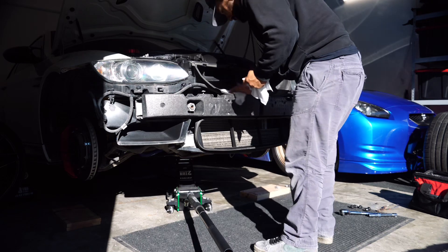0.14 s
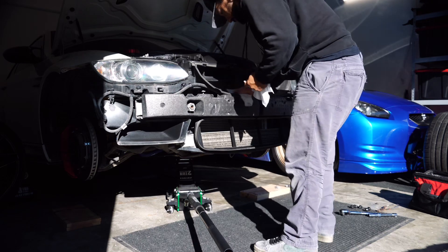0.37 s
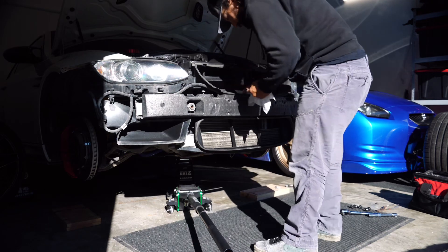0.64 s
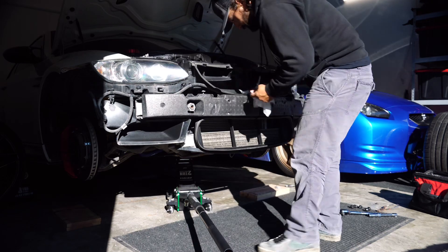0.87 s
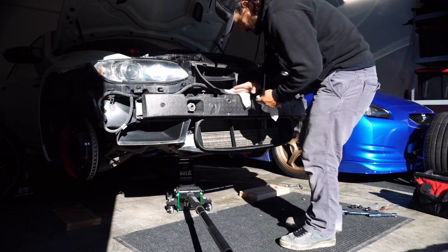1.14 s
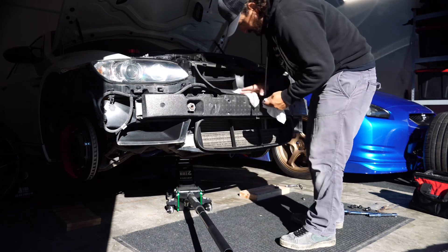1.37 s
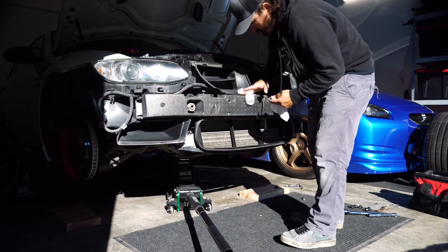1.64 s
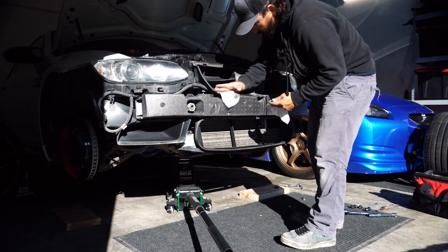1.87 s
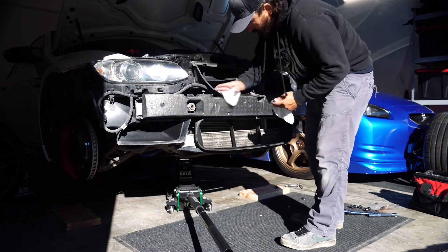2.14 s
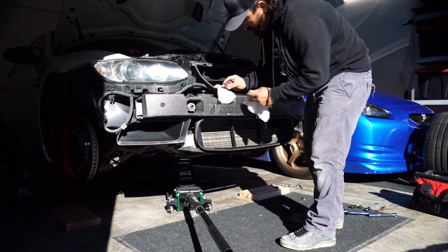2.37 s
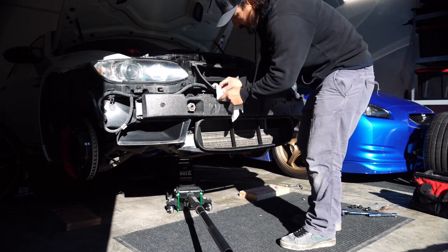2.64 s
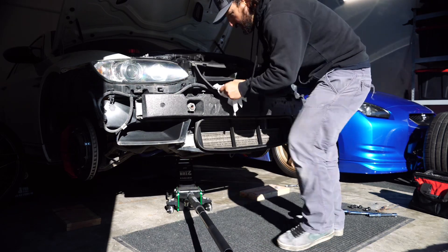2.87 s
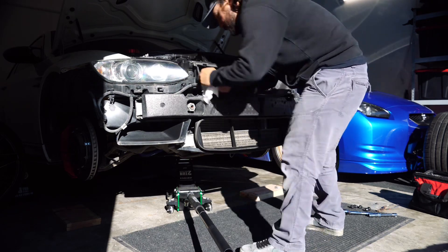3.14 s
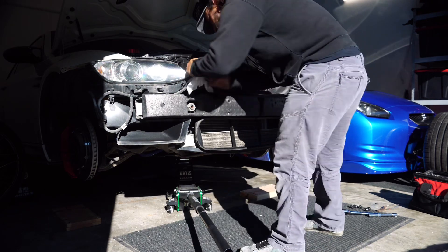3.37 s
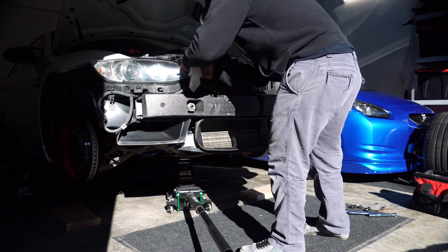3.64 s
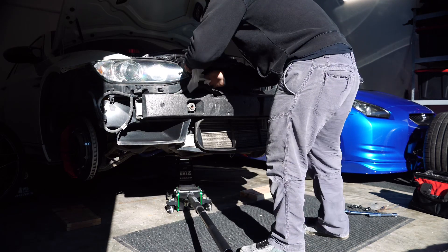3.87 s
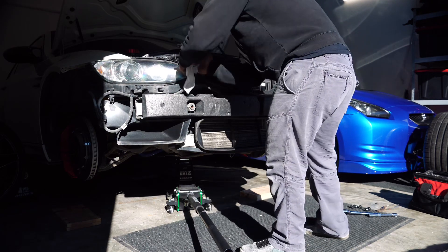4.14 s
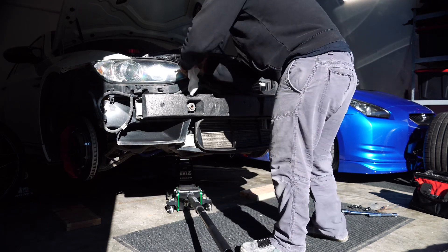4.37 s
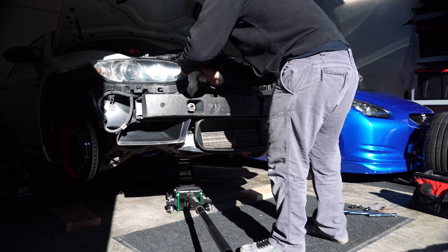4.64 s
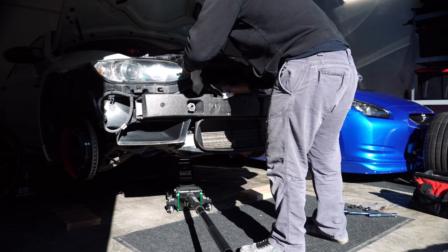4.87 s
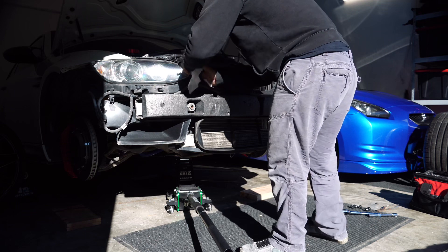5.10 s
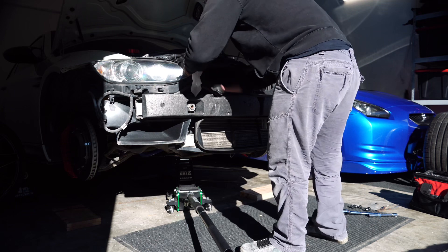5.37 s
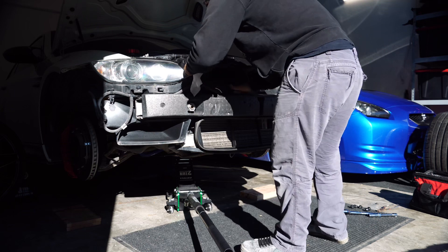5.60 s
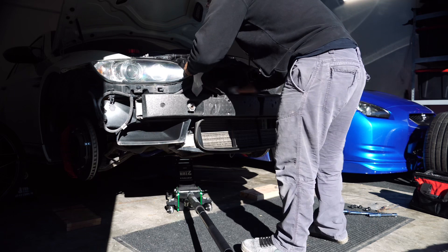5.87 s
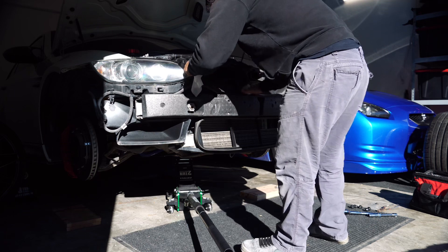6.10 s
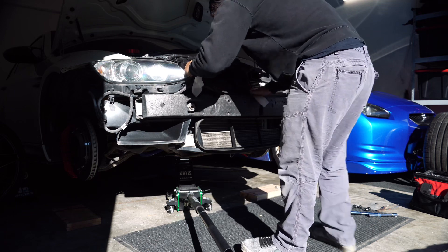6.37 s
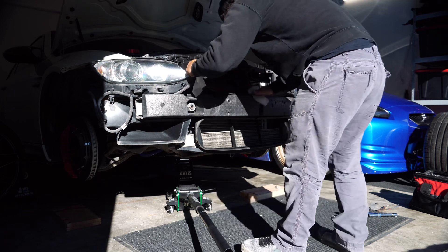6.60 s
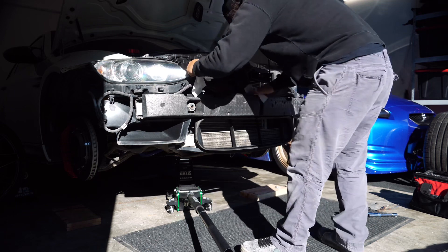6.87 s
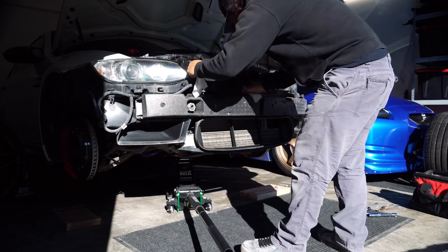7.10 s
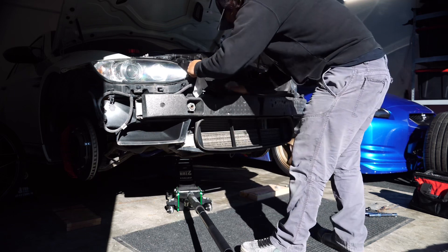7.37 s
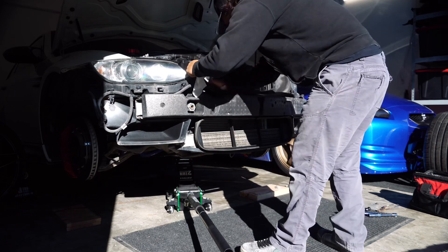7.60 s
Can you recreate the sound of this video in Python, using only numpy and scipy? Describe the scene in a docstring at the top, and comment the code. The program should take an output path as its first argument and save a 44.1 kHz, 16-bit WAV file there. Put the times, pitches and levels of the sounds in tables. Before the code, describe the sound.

At the mouth of a garage, a cloth rag scrubs a car's bare front in quick, gritty back-and-forth strokes from the outset. Loose clips and hollow panels tick and knock, hardest just after four seconds, followed by a short squeak. A distant dove coos early and near the end. Low wind rumbles on the unshielded microphone, buffeting around two seconds and violently distorting around seven.

```python
"""A cloth rag is heard at once, scrubbing to and fro over the bare front of a car at the mouth of a garage.
The rag is friction noise shaped by hand speed, with drumming of the panel; knuckles and loose clips knock
the panel's decaying modes, and the cloth briefly squeaks and swishes as gliding bands of noise.
Gusts of wind, low noise, pressure jolts and one bright crackle, drive the microphone into its limiter.
Far off a dove coos, a gliding tone with its octave, over steady air noise; sparse taps echo the work."""
import sys
import numpy as np
from scipy import signal
from scipy.fft import rfft, irfft
from scipy.io import wavfile
from scipy.ndimage import uniform_filter1d, minimum_filter1d

SR = 44100
rng = np.random.default_rng(int(sys.argv[2]) if len(sys.argv) > 2 else 0)


def persist_wave(psi):
    """Save psi, clipped to +-1, as 16-bit WAV."""
    counts = np.round(np.clip(psi, -1, 1) * 32767).astype(np.int16)
    wavfile.write(sys.argv[1], SR, np.atleast_2d(counts).T)


def volts(x):
    """Linear amplitude factor 10**(x/20) for a level x in dB, scalar or array-like."""
    e = np.asarray(x, float) / 20
    return 10 ** e


N = 341334  # length [samples]
HZ = np.fft.rfftfreq(N, 1 / SR)


def evened(x):
    """Normalisation: scales a signal to rms 1."""
    return x / np.sqrt(np.mean(x ** 2) + 1e-20)


def read(points, hz):
    """Interpolation: reads a spectrum on a logarithmic frequency axis."""
    f, value = np.transpose(points)
    return np.interp(np.log(hz + 1), np.log(f + 1), value)


def along(rows):
    """Interpolation: reads each column of a time curve at every sample."""
    s, *columns = np.transpose(rows)
    return [np.interp(np.arange(N) / SR, s, c) for c in columns]


def coloured(x, points, lo, hi):
    """Linear filtering: multiplies the spectrum of x by a curve, then sets rms 1 between lo and hi Hz."""
    z = rfft(x) * volts(read(points, HZ))
    in_band = irfft(z * (HZ > lo) * (HZ < hi), N)
    return irfft(z, N) / np.sqrt(np.mean(in_band ** 2))


def wobble(samples):
    """Low-pass noise: twice-averaged chance of rms 1, slower for a longer average."""
    once = uniform_filter1d(rng.standard_normal(N), int(samples))
    return evened(uniform_filter1d(once, int(samples)))


# Spectrum of outdoor air: (frequency [Hz], relative spectral level [dB])
AIR_SPECTRUM = [(35, -29), (60, 1), (183, -6), (313, -13), (869, -13.5), (1100, -15.5), (1870, -22.5),
                (3510, -25), (7210, -36.5), (12900, -39), (15500, -60.5)]


def air():
    """Stationary broadband noise: a random signal takes on the spectrum of the outdoor air."""
    return volts(-52) * coloured(rng.standard_normal(N), AIR_SPECTRUM, 150, 15000)


# Coos of the dove: (start [s], length [s], starting pitch [Hz], glide over the coo [Hz], rms level before
# quaver and swell [dB])
COOS = [(.42, 0.12, 488, 16, -45.5), (.64, 0.3, 486, 27, -47), (1.33, 0.13, 503, 0, -40),
        (7.27, 0.55, 509, 4.5, -46.5)]


def dove():
    """Frequency modulation: a nearly pure whistle with a faint octave glides and quavers a little."""
    out = np.zeros(N + SR)
    sway_hz, sway_db = 7.0 * wobble(1100), 2.4 * wobble(500)
    for start, length, hz, glide_hz, db in COOS:
        u = np.linspace(0, 1, round(length * SR))
        first = round(start * SR)
        at = np.minimum(first + np.arange(len(u)), N - 1)
        turn = 2 * np.pi * np.cumsum(hz + glide_hz * u + sway_hz[at]) / SR
        swell_db = -6.0 * (u - .3) ** 2 / .3
        whistle = np.sin(turn) + volts(-20.5) * np.sin(2 * turn)
        tone = volts(db + sway_db[at] + swell_db) * whistle
        out[first:][:len(u)] += np.sqrt(2) * tone * signal.windows.tukey(len(u), .45)
    return out[:N]


# The hardest buffets: (time of the peak [s], height before the rebound is taken off [full scale, negative =
# suction], rise [s])
JOLTS = [(1.734, -1.3, 0.011), (1.771, 0.3, 0.0085), (1.843, -0.6, 0.0078), (1.866, -0.4, 0.0081),
         (1.911, 0.4, 0.012), (1.959, .7, 0.0068), (6.973, 0.8, 0.015), (6.995, -3.3, 0.0062),
         (7.021, 2.5, .009), (7.049, 3, .007), (7.13, 0.6, 0.0065), (7.145, -0.5, 0.0038),
         (7.181, 3.5, 0.00715), (7.228, -2.4, .008), (7.25, 0.74, 0.0042), (7.375, 0.97, 0.0097)]


def jolts():
    """Pressure pulse: each jolt is a hump with a steep front and a slow, shallow rebound."""
    front_power, rebound_share = 4.5, .2
    out = np.zeros(N)
    for s, height, rise in JOLTS:
        u = np.arange(SR // 5) / SR / rise
        hump = (u * np.exp(1 - u)) ** front_power
        rebound = rebound_share * (u / 3 * np.exp(1 - u / 3)) ** 2
        out[round((s - rise) * SR):][:len(u)] += height * (hump - rebound)
    return out


# Wind on the microphone: (time [s], level of the deep push [dB], flutter over the push [dB])
GUSTS = [(0.0, -27, -13.5), (0.3, -12, -15.5), (0.52, -20, -19.5), (0.82, -8, -20), (0.88, -22.5, -15),
         (1.23, -11, -27), (1.27, -14.5, -10.5), (1.53, -20, -27.5), (1.85, -7, -4), (2.33, -26, -20),
         (2.54, -10, -21.5), (2.95, -22, -19), (3.21, -14.5, -26), (4.42, -45.5, -8.5), (4.87, -25.5, -22),
         (5.0, -33, -13), (5.69, -22, -20), (5.76, -7.5, -17.5), (6.1, -18.5, -19), (6.12, -18, -28),
         (6.29, -34.5, -16.5), (6.45, -20.5, 0), (6.68, -16, -27), (6.83, -16.5, -4.5), (6.98, -4.5, -25),
         (7.11, -12, 0), (7.37, -6.5, -20.5), (7.41, -26, -5), (7.46, -4.5, -30), (7.74, -30, -13)]
# Spectrum of the deep push: (frequency [Hz], relative spectral level [dB])
PUSH_SPECTRUM = [(2.4, -10.5), (4.0, -8.5), (16, 6.5), (27, 3), (40, -7.5), (70, -29.5), (91, -60),
                 (150, -120)]
# Spectrum of the flutter: (frequency [Hz], relative spectral level [dB])
FLUTTER_SPECTRUM = [(26, -43), (45, 3), (78, -2.5), (194, -29), (303, -37), (504, -45), (600, -51),
                    (780, -83.5), (1320, -120)]


def wind():
    """Turbulent pressure: slow pushes carry a faster, lumpy flutter, and the hardest buffets are jolts."""
    push_db, flutter_db = along(GUSTS)
    push = coloured(rng.standard_normal(N), PUSH_SPECTRUM, 12.4, 45)
    lumpy = rng.standard_normal(N) * volts(4.0 * wobble(810))
    flutter = coloured(lumpy, FLUTTER_SPECTRUM, 60, 93)
    return volts(push_db) * (push + volts(flutter_db) * flutter) + jolts()


# Reverberation of the garage: (frequency [Hz], time to fall by 60 dB [s])
GARAGE_DECAY = [(200, 0.44), (800, 0.38), (3000, 0.3), (10000, 0.49)]


def garage(x):
    """Reverberation: convolution with sparse taps of random sign, each band dying at its own speed."""
    taps, at = np.zeros(SR // 2), np.arange(200, SR // 2 - 20, 20)
    taps[at + rng.integers(0, 20, len(at))] = rng.choice([-1., 1.], len(at))
    hz, t, z = signal.stft(taps, SR, nperseg=256)
    decay = volts(-60 * t / read(GARAGE_DECAY, hz)[:, None])
    tail = signal.istft(z * decay, SR, nperseg=256)[1]
    return signal.oaconvolve(x, tail / np.linalg.norm(tail))[:N]


def band(rows, smooth, ratio):
    """Amplitude modulation: noise on a multiple of a gliding tone, narrower the smoother its wobble."""
    hz, db = along(rows)
    start, end = round(rows[0][0] * SR), round(rows[-1][0] * SR)
    fuzzy = wobble(smooth) * np.sin(2 * np.pi * ratio * np.cumsum(hz) / SR)
    out = np.zeros(N)
    out[start:end] = (volts(db) * fuzzy)[start:end] * signal.windows.tukey(end - start, .3)
    return out


# The cloth whistles over a smooth edge: (time [s], frequency before the ratio [Hz], modulator level [dB])
SQUEAK = [(4.59, 2950, -52), (4.63, 3000, -45), (4.8, 3250, -55)]
# A thin airy swish rises as the cloth is drawn off: (time [s], frequency before the ratio [Hz],
# modulator level [dB])
SWISH = [(.6, 10500, -58), (.68, 12500, -61), (.8, 13500, -60), (.88, 14000, -64)]


def squeak():
    """Narrow-band friction noise: the whistle with its near octave, and the swish."""
    whistle = band(SQUEAK, 220, 0.97)
    near_octave = volts(-10) * band(SQUEAK, 150, 2.1)
    return whistle + near_octave + band(SWISH, 9, 0.98)


# Modes of hollow plastic and sheet metal: (frequency [Hz], level [dB], time to fall by 60 dB [s])
PANEL = [(151, -3.5, 0.042), (197, 1.5, 0.049), (274, 2.5, 0.037), (378, -2.5, 0.053), (476, 1.5, 0.043),
         (563, 4, 0.034), (668, -8, 0.18), (740, -1, 0.073), (794.5, 3, 0.049), (863, 1, 0.043),
         (970, -12, 0.18), (1129, -4, 0.053), (1308, -3.5, 0.048), (1400, -4, 0.022), (1495, -1.5, 0.02),
         (1716, -3, 0.035), (1997, 2, 0.013), (2274, -2.5, 0.026), (2610, 1, 0.013), (3220, -7, .011),
         (3470, 2.5, .011), (4100, -6.5, 0.016), (4740, -0.5, 0.007), (5500, -6.5, 0.019),
         (6400, -6, 0.0081), (7000, -22, 0.0056), (8200, -13.5, 0.0064)]
MODE_HZ = np.transpose(PANEL)[0]


def ring(shape_db, phase, grip):
    """Modal superposition: the spot struck sets each panel mode's weight, phase and tuning."""
    hz, db, t60 = np.transpose(PANEL)[:, :, None]
    t = np.arange(SR // 5) / SR
    swing = np.sin(2 * np.pi * hz * grip[:, None] * t + phase[:, None])
    build = np.minimum(hz * t, 1)  # over one cycle
    decay_db = -60 * t / np.maximum(t60, .003)
    return (volts(db + shape_db[:, None] + decay_db) * swing * build).sum(0)


# Knocks: (time [s], level before a common trim [dB], then thud, clack and tick over the middle modes [dB])
KNOCKS = [(1.348, -41, 19, -12, -7), (1.54, -29.5, -2, -12, -11), (1.988, -23.5, -23, 9.5, 12),
          (2.731, -30, 0.5, 0.5, -13), (2.921, -42, -18, 7, 4), (3.031, -32, 5, 5, -3),
          (3.059, -45, -13, 1.1, -4), (3.351, -36, -16, -1, -10), (3.537, -30.5, -13, -1.1, -13),
          (3.631, -27, 7, -3, -19), (3.675, -34.5, 6, 5, -12), (3.706, -21, -1.5, -10, -20),
          (3.743, -27.5, 4, -17, -13), (3.779, -39, -1, -5, -16), (4.012, -35, 6, 5, -11),
          (4.028, -27, 5, -19, -22), (4.323, -11.5, -2, -8, -16), (4.332, -16.5, 2, 6, -1),
          (4.356, -21, 2, -11, -17), (4.39, -26.5, -1, -5, -21), (4.42, -37, -6, 3, -19),
          (4.547, -18, -36, 1.5, -19), (4.575, -23.5, -30, -0.5, -26), (4.762, -27.5, 1.5, -22, -32),
          (4.804, -24, -1.5, 2.5, -18), (5.135, -24.5, -12, -14, 0), (5.229, -30.5, -2, -8, -14),
          (5.394, -48, -10.5, -10, -9), (5.416, -30.5, 4, .1, -13), (5.454, -26, -8, -6, -9),
          (5.53, -34, -5, -23, 0), (6.04, -30.5, -20, -10, 5.5), (6.19, -37, -16, -12, -5),
          (6.203, -45, -13, -2, 14), (6.3, -36, 3.5, -19, -11), (6.441, -49, -17, 4, -7),
          (6.46, -31.5, -14, 3, -27), (6.485, -31.5, -12, 1, -19), (6.611, -33, -20, -14, -11),
          (7.403, -39.5, -15, 18, 1)]
# Where thud, middle, clack and tick are placed: (frequency [Hz])
REACH_HZ = [280, 800, 1900, 4500]


def knocks():
    """Impact excitation: a blow and a short rattle of weaker ones drive the modes its hardness reaches."""
    rattle_s, dry_per_db = .012, 0.0238  # the rattle dies sooner the harder its tick
    out, t = np.zeros(N + SR), np.arange(SR // 10) / SR
    chance, size = rng.random((2, len(KNOCKS), len(t)))
    phase, detune = rng.random((2, len(KNOCKS), 2, len(PANEL)))
    for k, (s, db, thud_db, clack_db, tick_db) in enumerate(KNOCKS):
        fade = np.exp(-t / rattle_s * np.exp(dry_per_db * tick_db))
        bounces = 1.135 * fade * (size[k] - .5) * (chance[k] < 900 / SR)  # 900 per second
        reach = list(zip(REACH_HZ, (thud_db, 0, clack_db, tick_db)))
        shape_db = db - 8.5 + read(reach, MODE_HZ)
        grip = 1 + .06 * (detune[k] - .5)  # the hand bends the part a little differently each time
        blow, bounce = (ring(shape_db, 2 * np.pi * p, g) for p, g in zip(phase[k], grip))
        sound = signal.fftconvolve(bounces, bounce)
        sound[:len(blow)] += blow
        out[round(s * SR):][:len(sound)] += sound
    return out[:N]


def snags(per_s, spread_db):
    """Impulsive friction: fibres catch on dirt as random clicks, a few of them large."""
    size = volts(spread_db * np.minimum(rng.exponential(1, N), 5)) * (rng.random(N) < per_s / SR)
    return evened(size * rng.choice([-1., 1.], N))


def mottled(x, patchy_db):
    """Time-varying filtering: as the cloth folds, patches of colour a few hundred Hz wide drift by."""
    z = signal.stft(x, nperseg=512)[2]
    across_hz = uniform_filter1d(rng.standard_normal(z.shape), size=5, axis=0)
    patches = evened(uniform_filter1d(across_hz, size=14, axis=1))
    return evened(signal.istft(z * volts(patchy_db * patches), nperseg=512)[1][:N])


# Rag strokes, to and fro: (start [s], length [s], share of the stroke where the hand is fastest
# [0-1, held to 0.1-0.9], scrape level at full speed [dB], fine grit level at full speed [dB])
STROKES = [(-0.06, 0.2, 0.06, -41, -55), (0.124, 0.2, 0.48, -46.5, -62), (0.323, 0.17, 0.51, -43, -59),
           (0.482, 0.22, 0.28, -48.5, -64), (0.624, 0.31, 0.4, -53, -73), (0.845, 0.3, 0.45, -40.5, -51),
           (1.117, 0.2, 0.67, -44.5, -58.5), (1.32, 0.25, 0.43, -43.5, -55),
           (1.531, 0.16, 0.48, -43, -54.5), (1.687, 0.22, 0.55, -43, -54), (1.885, 0.18, 0.48, -45, -58),
           (2.076, 0.19, 0.16, -46, -57.5), (2.566, 0.26, 0.63, -50.5, -69.5),
           (2.785, 0.155, 1, -52.5, -68.5), (2.945, 0.38, 0.54, -45.5, -59),
           (3.328, 0.15, 0.55, -44.5, -59), (3.472, 0.23, 0.24, -43, -58), (3.695, 0.19, 0.52, -43, -61),
           (3.897, 0.26, 0.25, -44.5, -63.5), (4.174, 0.26, 0.8, -48.5, -61.5),
           (4.44, 0.19, 0.46, -44.5, -64.5), (4.558, 0.41, 0.6, -41.5, -57.5),
           (4.957, 0.26, 0.45, -43.5, -56), (5.215, 0.39, 0.61, -44.5, -55),
           (5.602, 0.18, 0.67, -44, -54.5), (5.79, 0.23, 0.45, -42.5, -55), (6.024, 0.11, 0.63, -43, -62.5),
           (6.145, 0.11, 0.58, -41.5, -56.5), (6.262, 0.14, 0.77, -44, -58.5),
           (6.401, 0.14, 0.5, -44.5, -52.5), (6.569, 0.2, 0.47, -45.5, -65), (6.78, 0.12, 0.33, -51, -71),
           (6.913, 0.13, 0.56, -47.5, -68.5), (7.076, 0.33, 0.1, -52, -73.5),
           (7.22, 0.28, 0.55, -49, -61.5), (7.447, 0.18, 0.68, -51.5, -60.5), (7.627, 0.19, 0.2, -55, -66)]
# Brief bursts of bright noise: quick flicks of the rag, and at 7.205 s a crackle of the wind on the
# microphone: (start [s], length [s], share of the burst where it peaks [0-1], lower band level at the
# peak [dB], upper band level at the peak [dB])
BURSTS = [(2.709, 0.032, 0.6, -44, -62), (2.904, 0.03, 0.8, -49, -57.5), (3.027, 0.045, .3, -41, -55),
          (3.64, 0.028, .6, -46, -60), (7.205, 0.011, 0.3, -47, -71)]


def strokes(overlap, law, column):
    """Power law of friction: level follows a power of hand speed, which rises, holds and falls once.
    The brief bursts take the same rise and fall."""
    cruise = 1.1  # full speed is reached early and held
    t, power = np.arange(N) / SR, np.full(N, 1e-10)
    for start, length, fastest, *level_db in STROKES + BURSTS:
        ends = [start - overlap, start + length * np.clip(fastest, .1, .9), start + length + overlap]
        part = slice(max(round(ends[0] * SR), 0), round(ends[2] * SR))
        swing = np.sin(np.interp(t[part], ends, [0, np.pi / 2, np.pi]))
        speed = np.clip(cruise * swing, 0, 1)
        power[part] += (volts(level_db[column]) * speed ** law) ** 2
    return np.sqrt(power)


# Spectrum of the scrape: (frequency [Hz], relative spectral level [dB])
SCRAPE_SPECTRUM = [(650, 2.5), (1100, -2.5), (1360, -1.5), (1550, -1.5), (2220, -1), (3580, 3), (4180, -3),
                   (5090, -1.5), (7410, -16), (8500, -18.5), (11000, -57), (18700, -120)]
# Spectrum of the fine grit: (frequency [Hz], relative spectral level [dB])
GRIT_SPECTRUM = [(4120, -11), (7000, -3.5), (7760, -2.5), (9320, -2), (10400, -2.5), (12800, -3),
                 (15500, -8.5)]
# Weight of the hand, heard as drumming: (time [s], level before wobble and hand speed act on it [dB])
LEAN = [(0.0, -66), (0.24, -53.5), (0.95, -45), (1.16, -47), (1.85, -63), (2.05, -52), (2.26, -48),
        (2.54, -48), (2.85, -52), (3.41, -48.5), (3.58, -44), (3.68, -46), (3.81, -45), (4.14, -61.5),
        (4.35, -40.5), (4.48, -44), (4.72, -45), (4.91, -49.5), (5.28, -52), (5.76, -51.5), (6.08, -46.5),
        (6.83, -49.5), (7.37, -47.5), (7.74, -47)]


def rag():
    """Friction excitation: snags colour into scrape and grit, and drum the low panel modes under the hand.
    The wind's one brief crackle is carried by the same noise."""
    # the far end of the cloth still slides while the hand turns; the coarse scrape carries on longer
    scraping = strokes(overlap=0.012, law=0.81, column=0)
    gritting = strokes(overlap=0.0055, law=1.66, column=1)
    drag = mottled(snags(9000, 0.71), patchy_db=1.32) * volts(1.15 * wobble(420))  # the cloth slips and grips
    scrape = scraping * coloured(drag, SCRAPE_SPECTRUM, 1700, 8000)
    grit = gritting * coloured(drag, GRIT_SPECTRUM, 9650, 13100)
    # soft cloth hardly reaches the high modes: -9 dB per octave above 900 Hz
    soft_db = -9 * np.maximum(np.log2(MODE_HZ / 900), 0)
    damped = ring(soft_db, *np.ones((2, len(PANEL))))
    lean = volts(along(LEAN)[0] + 1.55 * wobble(670))
    bumps = snags(1500, 2.8) * lean * evened(scraping) ** 0.32  # drumming partly follows the scrape
    drumming = signal.oaconvolve(bumps, damped)[:N] / np.linalg.norm(damped)
    return scrape + grit + drumming


def scene():
    """Superposition: work on the car with its echo, outdoor air, the bird and the wind."""
    hits, rubs = knocks(), rag() + squeak()
    echo = garage(volts(-5.0) * hits + volts(-14.5) * rubs)
    return (hits + rubs + echo + air() + dove() + wind())[None]


def top_cut(x):
    """Nothing passes above the cut-off."""
    return signal.sosfilt(signal.butter(12, 15670, fs=SR, output="sos"), x)


def record(dry):
    """Peak limiting: gain ducks everything as the biggest gusts arrive; what slips past is clipped."""
    recovery_db_per_s = 308
    over_db = np.maximum(20 * np.log10(abs(dry) + 1e-9), 0)  # above full scale
    fall = np.arange(N) * recovery_db_per_s / SR
    held_db = np.maximum.accumulate(over_db + fall, axis=1) - fall
    ahead_db = -minimum_filter1d(-held_db, size=41, axis=1)  # widens each peak both ways
    duck_db = uniform_filter1d(ahead_db, size=71, axis=1)
    limited = np.clip(dry / volts(duck_db), -1, 1)
    return top_cut(limited)


dry = scene()
out = record(dry)
persist_wave(out)
```